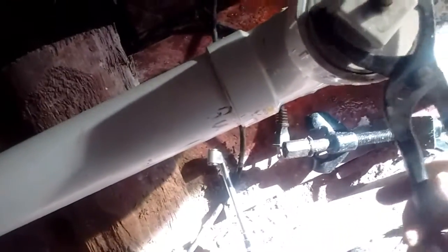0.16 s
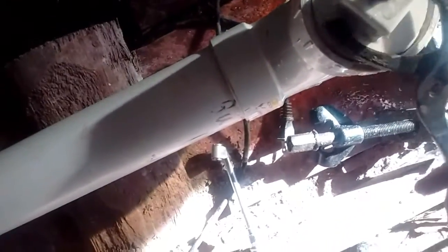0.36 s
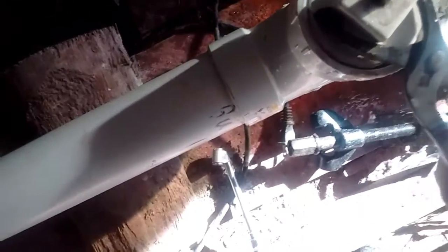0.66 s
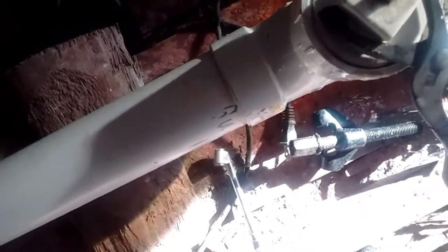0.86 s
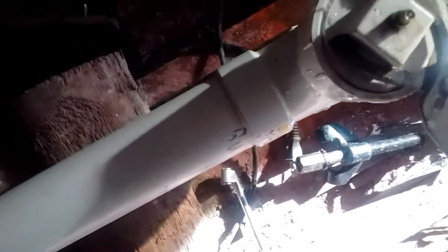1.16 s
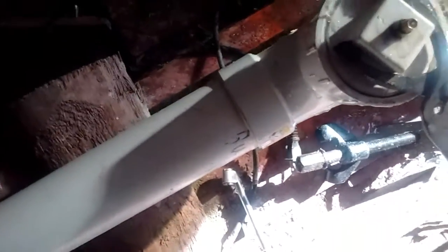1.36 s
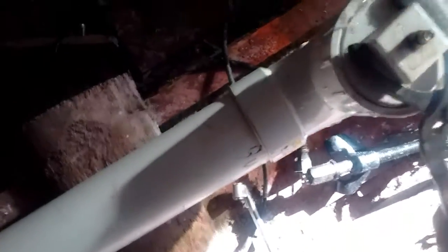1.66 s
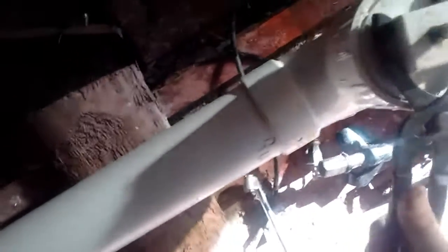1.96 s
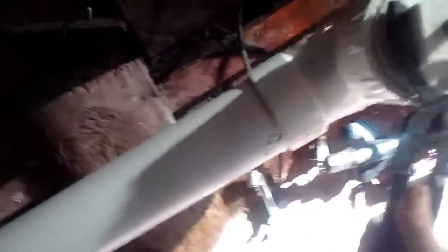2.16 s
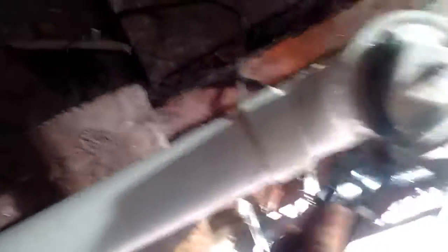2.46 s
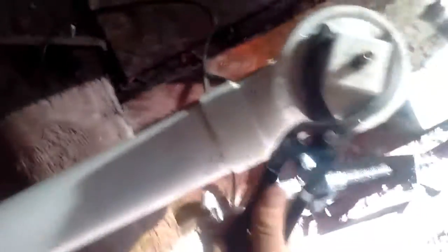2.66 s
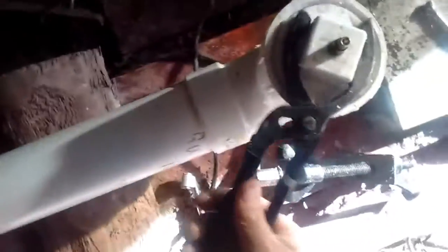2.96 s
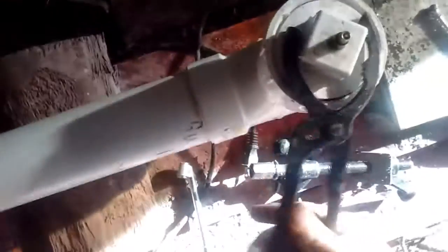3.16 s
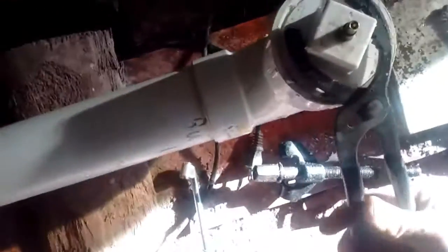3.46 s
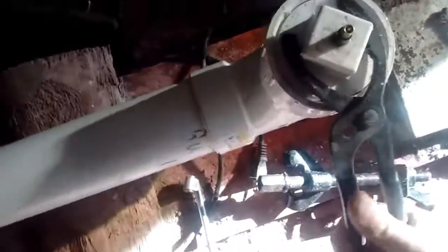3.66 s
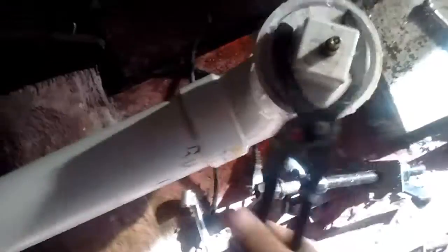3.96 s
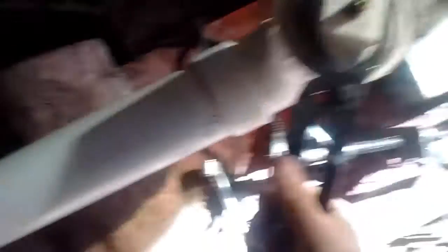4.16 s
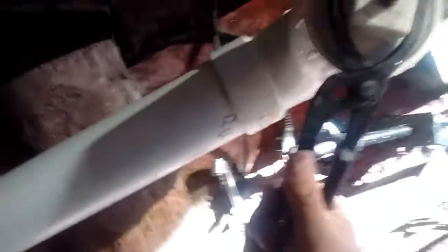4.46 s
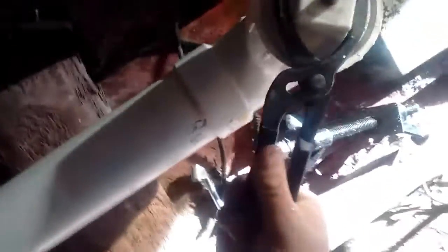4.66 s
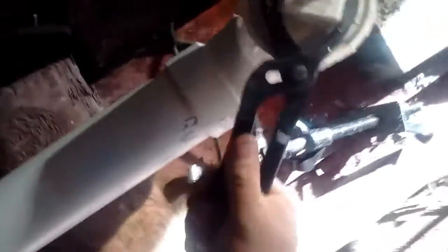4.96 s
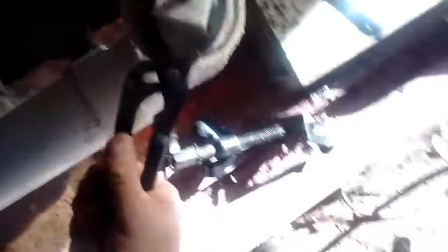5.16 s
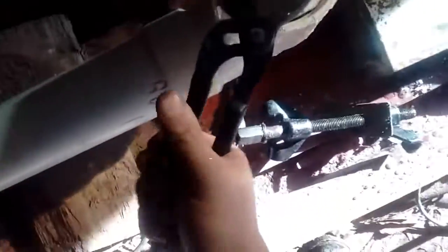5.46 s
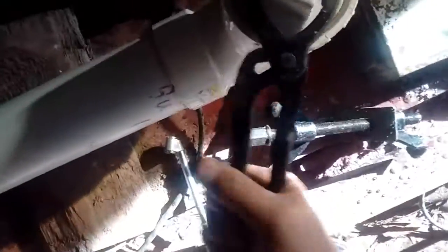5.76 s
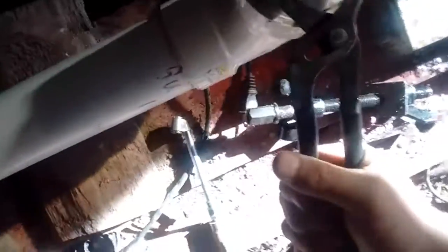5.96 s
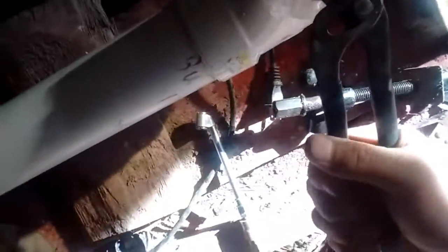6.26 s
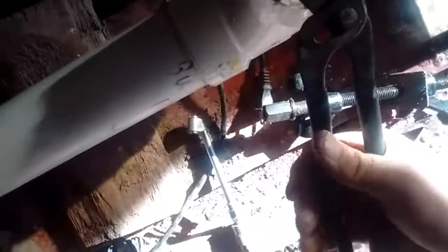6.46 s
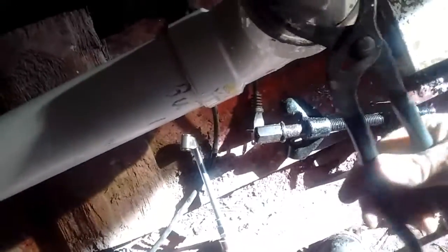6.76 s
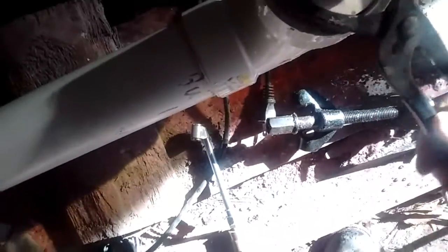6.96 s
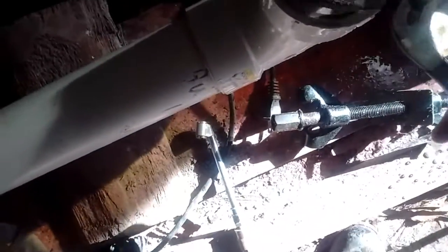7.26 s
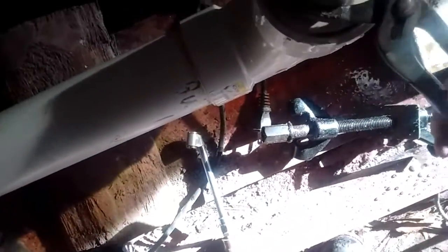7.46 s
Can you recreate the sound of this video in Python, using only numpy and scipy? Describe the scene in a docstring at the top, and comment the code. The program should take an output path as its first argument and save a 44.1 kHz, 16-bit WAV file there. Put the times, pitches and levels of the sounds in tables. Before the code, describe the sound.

Close up and nearly dry, a leaking pipe joint spits and bubbles quickly, then turns into an unsteady hissing spray that grows stronger in the second half. Pliers tightening the plastic nut add hollow bumps, brief judders and a few sharp clacks. Underneath are wet gurgles, small chirps of air, ticking droplets, soft splashing on the floor and a slight handling rumble on the microphone.

```python
"""Water sprays from a leaking plastic pipe fitting while pliers tighten it, close to a mono microphone.
The leak starts by sputtering, some twenty squelches and spits a second. Air gurgles and whistles in the
wet thread; water drums on the pipe and patters on the floor. Soon the pliers knock and clack on the
hollow pipe, and air and handling rumble on the microphone. At 2.3 s the leak opens into a hissing jet.
From 3.6 s the jaws now and then judder and slip on the nut, and the thread creaks."""
import sys
import numpy as np
from scipy import signal
from scipy.fft import rfft, irfft, next_fast_len
from scipy.io import wavfile
from scipy.ndimage import uniform_filter1d, map_coordinates

SR = 44100
rng = np.random.default_rng(int(sys.argv[2]) if len(sys.argv) > 2 else 0)


def waveform_to_disk(signal):
    """Save audio, clipped to [-1, 1], as 16-bit WAV at the path in sys.argv[1]."""
    frames = np.transpose(np.atleast_2d(signal))
    scaled = np.clip(frames, -1, 1) * 32767
    samples = np.round(scaled).astype(np.int16)
    wavfile.write(sys.argv[1], SR, samples)


N = 335601
TIME = np.arange(N) / SR


def gain_of(db):
    return 10 ** (np.asarray(db) / 20)


def unit_rms(x):
    return x / np.sqrt(np.mean(x ** 2) + 1e-20)


def unit_peak(x):
    return x / abs(x).max()


def value_at(curve, time_s, column=1):
    curve = np.array(curve)
    return np.interp(time_s, curve[:, 0], curve[:, column])


def gain_curve(curve, column):
    return gain_of(value_at(curve, TIME, column))


def add(mix, start_s, sound):
    part = mix[max(round(start_s * SR), 0):][:len(sound)]
    part += sound[:len(part)]


def colour(x, spectrum, size=4096):
    """Minimum-phase filter of unit energy with the given spectrum."""
    hz, db = np.transpose(spectrum)
    bin_hz = abs(np.fft.fftfreq(size, 1 / SR))
    log_gain = np.log(gain_of(np.interp(np.log(bin_hz + 1), np.log(hz), db)))
    taps = np.fft.ifft(np.exp(np.conj(signal.hilbert(log_gain)))).real[:size // 2]
    return signal.oaconvolve(x, taps / np.linalg.norm(taps))[:len(x)]


def wander(rate_hz):
    """Smooth random drift, rms 1."""
    size = next_fast_len(N, True)
    lowpass = np.exp(-(np.fft.rfftfreq(size, 1 / SR) / rate_hz) ** 2)
    return unit_rms(irfft(rfft(rng.standard_normal(size)) * lowpass, size)[:N])


def impacts(per_s, spread_db, share):
    """Separate uneven hits carry this share of the power; the rest is a wash of noise."""
    size = gain_of(spread_db * np.minimum(rng.exponential(1, N), 4.5))
    hits = size * rng.choice([-1., 1.], N) * (rng.random(N) < per_s / SR)
    return np.sqrt(share) * unit_rms(hits) + np.sqrt(1 - share) * rng.standard_normal(N)


def resonate(x, pitch_hz, width_hz):
    """Steep resonance following a pitch curve; white noise keeps its level."""
    carrier = np.exp(2j * np.pi * np.cumsum(pitch_hz) / SR)
    pole = np.exp(-np.pi * width_hz / SR)
    baseband = signal.lfilter([(1 - pole) ** 2], [1, -2 * pole, pole * pole], x / carrier + 1e-18)
    return (carrier * baseband).real * np.sqrt(8 / (1 - pole))


# Prominent spits: start_s, length_s, level_db
MAIN_SPITS = [(0.043, 0.02, -51.5), (0.104, 0.015, -50), (0.176, 0.012, -49), (0.197, 0.014, -46.5),
              (0.266, 0.0075, -45), (0.332, 0.013, -48), (0.398, 0.014, -42), (0.426, 0.018, -46),
              (0.453, 0.044, -44), (0.534, 0.012, -43.5), (0.589, 0.011, -43), (0.621, 0.012, -42),
              (0.671, 0.037, -42.5), (0.729, 0.014, -42.5), (0.751, 0.031, -38.5), (0.795, 0.018, -42.5),
              (0.827, 0.017, -36.5), (0.893, 0.015, -41), (0.916, 0.043, -40.5), (1.001, 0.02, -40.5),
              (1.17, 0.028, -45.5), (1.222, 0.018, -46), (1.304, 0.026, -47), (1.339, 0.0287, -47.5),
              (1.46, 0.012, -44.5), (1.514, 0.024, -46.5), (1.638, 0.038, -46), (1.749, 0.021, -50),
              (1.829, 0.015, -45.5), (1.892, 0.013, -53), (2.02, 0.017, -52.5), (2.057, 0.013, -50.5),
              (2.112, 0.0043, -40.5), (2.171, 0.015, -49.5), (2.318, 0.011, -43)]
# Course of the sputter: time_s, spits_per_s, spit_db, squelch_db, burst_hz
SPUTTER_CURVE = [(0, 14, -50.5, -48, 3840), (0.3, 14, -46, -47, 4120), (0.75, 17, -44, -43, 4380),
                 (1.1, 29, -48, -44, 5120), (1.5, 25, -49.5, -43, 4850), (1.8, 24, -54.5, -40.5, 4720),
                 (1.95, 22, -61, -53, 5160), (2.3, 24, -58, -52, 5000)]
SPUTTERING = TIME < MAIN_SPITS[-1][0]


def spit_train(jitter_beats=0.41, open_share=0.61, spread_db=8.5, pitch_spread=0.079, octaves_per_s=14):
    """Random spits keep an uneven beat between the prominent ones."""
    chance, spits = rng.uniform(-1, 1, (200, 5)), [MAIN_SPITS[0]]
    for before, after in zip(MAIN_SPITS, MAIN_SPITS[1:]):
        gap_s = after[0] - before[0]
        beats = max(round(gap_s * value_at(SPUTTER_CURVE, before[0] + gap_s / 2)), 1)
        for k in range(1, beats):
            late, longer, louder, _, _ = chance[len(spits)]
            start_s = before[0] + (k + jitter_beats * late) * gap_s / beats
            length_s = min(open_share * gap_s / beats, 0.022) * (1 + longer / 2)
            spits.append((start_s, length_s, value_at(SPUTTER_CURVE, start_s, 2) + spread_db * louder))
        spits.append(after)
    for (start_s, length_s, level_db), (*_, higher, faster) in zip(spits, chance):
        lead_db = value_at(SPUTTER_CURVE, start_s, 3)
        burst_hz = value_at(SPUTTER_CURVE, start_s, 4) * (1 + pitch_spread * higher)
        yield start_s, length_s, level_db, lead_db, burst_hz, octaves_per_s * (1 + faster)


# Spray of a spit: freq_hz, level_db
SPIT_SPECTRUM = [(1000, -11), (3000, -7.5), (4800, 3), (5600, 0.5), (6450, -6), (7300, 0), (8300, 4.5),
                 (9300, -6.5), (10200, -2), (11400, -6.5), (12600, -2), (14000, -21), (15300, 0)]


def sputter(squelch_db=-2, spit_db=1, low_hz=2600., rise_s=0.013, spray_hz=(7000., 10500.)):
    """A plug of water thins in the gap, climbing in pitch until it bursts into spray."""
    squelch_env, spit_env = np.zeros(N), np.zeros(N)
    pitch_hz, sweep_hz = np.full(N, low_hz), np.full(N, spray_hz[0])
    end_s = 0
    for start_s, length_s, level_db, lead_db, burst_hz, octaves_per_s in spit_train():
        lead = slice(round(end_s * SR), round(start_s * SR))
        end_s = start_s + length_s
        burst = slice(lead.stop, round(end_s * SR))
        to_go_s = abs(start_s - TIME[lead])
        pitch_hz[lead] = np.maximum(burst_hz * 2 ** (-octaves_per_s * to_go_s), low_hz)
        squelch_env[lead] = gain_of(lead_db) * (0.62 + 0.53 / (1 + to_go_s / rise_s))
        pitch_hz[burst] = burst_hz
        sweep_hz[burst] = np.geomspace(*spray_hz, len(TIME[burst]))
        spit_env[burst] = gain_of(level_db)
    pitch_hz, squelch_env, spit_env = uniform_filter1d([pitch_hz, squelch_env, spit_env], size=90)
    spit_env *= gain_of(1.8 * wander(70))
    linger = np.exp(-1 / (0.0009 * SR))
    spit_env = signal.lfilter([1 - linger], [1, -linger], spit_env)
    pitch_hz *= np.exp(0.04 * wander(90))
    squelch = resonate(impacts(1200, 2.4, 0.83), pitch_hz, width_hz=720) * gain_of(0.92 * wander(70))
    droplets = 0.9 * impacts(2600, 2.6, 0.4)
    sweep = gain_of(-5) * resonate(rng.standard_normal(N), sweep_hz, width_hz=1600)
    spit = colour(spit_env * (droplets + sweep) * gain_of(2 * wander(270)), SPIT_SPECTRUM)
    return gain_of(squelch_db) * squelch_env * squelch + gain_of(spit_db) * spit


# Jet strength as the nut turns: time_s, whistle_db, mist_db
JET_LEVELS = [(0, -69, -65.5), (0.6, -59, -60.5), (1.05, -48, -50.5), (1.22, -60, -57), (1.66, -74, -50.5),
              (1.8, -75, -57), (2.2, -63, -63), (2.32, -52, -48.5), (2.42, -37.5, -37), (2.52, -46, -39),
              (2.66, -51.5, -49.5), (3.15, -45, -47), (3.48, -53.5, -54), (3.97, -46, -51.5),
              (4.15, -57, -53), (4.52, -65, -49.5), (4.61, -45.5, -44.5), (5.13, -39.5, -42.5),
              (5.24, -59, -42.5), (5.4, -39.5, -42), (5.9, -37, -40.5), (6.0, -44, -47), (6.6, -39, -42.5),
              (6.91, -39, -44.5), (6.96, -46, -48), (7.61, -39, -43.5)]
# Whistling band, shifting with the shape of the gap: time_s, pitch_hz
WHISTLE_PITCH = [(0, 8240), (2.5, 8200), (3.2, 7945), (4.0, 8050), (4.6, 7960), (5.0, 8086), (5.85, 8244),
                 (6.35, 7814), (6.9, 7930), (7.25, 7764), (7.61, 7900)]
# Whistling band: freq_hz, level_db
WHISTLE_SPECTRUM = [(5500, -23), (6500, -6.5), (7100, -6), (7700, -0.5), (8150, 2.5), (8600, -1.5),
                    (9200, -20.5), (10500, -55)]
# Fine mist: freq_hz, level_db
MIST_SPECTRUM = [(1500, -25), (4500, -9), (5600, -6.5), (6400, -46), (7300, 2.5), (9300, -1.5), (9900, 0),
                 (10900, -3), (11700, -4.5), (12700, -2), (14200, -9.5), (15200, -2), (16000, -34)]


def jet(centre_hz=8050, choke_db=4):
    """A thin jet hisses in one unsteady band and breaks into mist; it chokes while the leak sputters."""
    speed = value_at(WHISTLE_PITCH, TIME) / centre_hz * np.exp(0.022 * wander(70))
    band = colour(rng.standard_normal(N), WHISTLE_SPECTRUM)
    hiss = map_coordinates(band, [np.cumsum(speed)], order=3, mode="mirror")
    whistle = gain_of(0.5 * wander(65)) * gain_curve(JET_LEVELS, 1) * hiss
    mist_env = gain_of(0.5 + 0.3 * wander(32)) * gain_curve(JET_LEVELS, 2)
    mist = mist_env * colour(impacts(2500, 0.41, 0.61), MIST_SPECTRUM)
    choking_db = choke_db * wander(28) * SPUTTERING
    swell_db = 0.7 * wander(14) + 0.8 * wander(110)
    return (whistle + mist) * gain_of(swell_db + choking_db)


def bubbles(per_s=260, spread_db=3, range_hz=(3500, 5200), decay_cycles=9, glide_per_s=14, kinds=24):
    """Tiny bubbles of many sizes ring briefly, rising in pitch."""
    out, t = np.zeros(N), np.arange(SR // 50) / SR
    strength = gain_of(spread_db * np.minimum(rng.exponential(1, N), 3))
    births = strength * (rng.random(N) < per_s / SR)
    kind = rng.integers(0, kinds, N)
    for k, pitch_hz in enumerate(np.geomspace(*range_hz, kinds)):
        age = t * pitch_hz / decay_cycles
        ring = np.sqrt(age) * np.exp(-age) * np.sin(2 * np.pi * pitch_hz * t * (1 + glide_per_s * t / 2))
        out += signal.oaconvolve(births * (kind == k), ring)[:N]
    return unit_rms(out)


# Water on the pipe, on the floor and in the seam: time_s, drum_db, patter_db, gurgle_db
WATER_LEVELS = [(0.0, -58, -58, -52), (0.72, -54.5, -52.5, -53), (1.55, -52, -49.5, -52),
                (1.93, -62.5, -56.5, -52.5), (2.29, -60, -58.5, -55), (2.45, -63.5, -55, -57.5),
                (2.65, -65, -58, -49.5), (3.07, -53.5, -52, -45.5), (3.24, -49.5, -54, -47.5),
                (3.64, -67, -64, -54), (4.19, -61.5, -58, -53.5), (4.98, -58, -57.5, -50),
                (5.3, -56.5, -53, -53), (5.83, -57, -56, -46.5), (6.1, -61, -61, -53.5),
                (6.38, -56, -56, -47.5), (6.74, -50.5, -53, -48.5), (6.91, -58, -63, -45),
                (6.95, -57, -65, -57), (7.03, -57.5, -60, -54), (7.61, -48.5, -51, -45.5)]
# Wash in the seam: freq_hz, level_db
GURGLE_SPECTRUM = [(1500, -43), (3000, -20), (3500, -9), (4100, -3), (4900, -4), (5500, -9.5),
                   (6300, -12.5), (7500, -45)]


def gurgle(wash_db=-4.5, bubble_db=-6, chirp_db=-10, cycles_per_s=16, low_hz=3800, high_hz=5200):
    """Air and water alternate in the thread: wash, bubbles and chirps that grow once the jet opens."""
    cycle = np.cumsum(cycles_per_s * np.exp(0.73 * wander(12))) / SR % 1
    start_hz = low_hz * np.exp(0.07 * wander(7.4))
    fizz = impacts(900, 2.5, 0.6) * gain_of(3 * wander(20))
    chirps = resonate(fizz, start_hz + (high_hz - start_hz) * cycle ** 5.1, width_hz=1400)
    chirps *= gain_of(chirp_db - 6 * SPUTTERING)
    wash = gain_of(wash_db + 4.6 * wander(62)) * colour(rng.standard_normal(N), GURGLE_SPECTRUM)
    return gain_curve(WATER_LEVELS, 3) * (wash + gain_of(bubble_db) * bubbles() + chirps)


# Drops on the pipe: freq_hz, level_db
DRUM_SPECTRUM = [(40, -50.5), (100, -11.5), (160, 1), (215, 0.5), (300, -4.5), (420, -3), (600, -10),
                 (1500, -43)]
# Drops on the floor: freq_hz, level_db
PATTER_SPECTRUM = [(150, -35), (400, -3.5), (850, 6), (1300, 5), (1750, 5.5), (2200, 1.5), (2800, 2),
                   (3400, -17), (6000, -39)]


def splash(gain_db=1.5):
    """Falling water drums on the hollow pipe and patters on the floor."""
    drum = gain_curve(WATER_LEVELS, 1) * colour(impacts(200, 1.3, 0.2), DRUM_SPECTRUM)
    patter = gain_curve(WATER_LEVELS, 2) * colour(impacts(500, 3.5, 0.37), PATTER_SPECTRUM)
    return gain_of(gain_db) * (drum + patter)


def small_pockets(count=10, over_gurgle_db=5, spread_db=3, low_hz=3800, high_hz=4900):
    """Small air pockets come at random, following the level of the gurgle."""
    when, size, pitch = rng.random((count, 3)).T
    start_s = (np.arange(count) + when) / count * TIME[-1]
    level_db = value_at(WATER_LEVELS, start_s, 3) + over_gurgle_db + spread_db * (2 * size - 1)
    return list(zip(start_s, level_db, low_hz + (high_hz - low_hz) * pitch))


# Larger air pockets: pop_s, level_db, pitch_hz
AIR_POCKETS = [(0.1366, -30, 4690), (0.5324, -30.5, 3930), (1.217, -36, 4260), (1.413, -33, 4600),
               (1.4787, -29, 3770), (1.503, -27, 4070), (1.6785, -28.5, 4610), (1.6824, -22.5, 3485),
               (1.6855, -25.5, 5000), (1.839, -28.5, 4960), (1.936, -31, 4920), (1.9457, -31.5, 4580),
               (1.9752, -27.5, 5060), (1.9804, -31, 4670), (2.1013, -29, 4850), (2.997, -32, 3940),
               (3.022, -28, 4670), (3.5257, -26.5, 4456), (3.5355, -32, 4740), (4.907, -33, 4100),
               (4.9686, -28, 4210), (5.1419, -27, 4290), (5.26, -33, 3800), (5.334, -33.5, 3800),
               (5.518, -30.5, 4360), (5.654, -30, 5000), (5.701, -40, 4730), (5.799, -30, 4310),
               (5.8936, -29, 4510), (6.021, -33, 4490), (6.48, -33, 4590), (7.076, -31, 4920),
               (7.226, -31.5, 4600)]


def squirts(gain_db=1, squeeze_s=0.0084, squeeze_db=-17, ring_s=0.0016, glide_per_s=9):
    """An air pocket squeezes through the seam with a rising chirp and pops as a ringing bubble."""
    out, t = np.zeros(N), np.arange(-0.04, 0.03, 1 / SR)
    pop_env = (t >= 0) * np.exp(-abs(t) / ring_s)
    for pop_s, level_db, pitch_hz in AIR_POCKETS + small_pockets():
        glide_hz = pitch_hz * np.exp(glide_per_s * t)
        chirp = unit_rms(resonate(rng.standard_normal(len(t)), glide_hz, width_hz=1400))
        squeeze = gain_of(squeeze_db) * chirp * np.exp(-abs(t) / squeeze_s)
        pop = pop_env * np.sin(2 * np.pi * np.cumsum(glide_hz) / SR)
        add(out, pop_s + t[0], gain_of(level_db + gain_db) * (squeeze + pop))
    return signal.sosfilt(signal.butter(4, 6500, fs=SR, output="sos"), out)


# Air whistling through the wet thread: start_s, length_s, from_hz, to_hz, level_db
AIR_SQUEAKS = [(0.265, 0.061, 3140, 2550, -52), (0.42, 0.034, 4700, 5220, -47),
               (0.608, 0.07, 4270, 3910, -44.5), (0.715, 0.039, 3910, 4380, -42.5),
               (0.855, 0.043, 2830, 4200, -45), (1.675, 0.021, 3210, 3784, -40),
               (2.14, 0.039, 3500, 4300, -50), (2.192, 0.036, 3100, 3390, -50.5),
               (2.74, 0.034, 4300, 4960, -47), (2.914, 0.029, 4260, 3690, -43),
               (2.994, 0.045, 3880, 5100, -40.5), (3.045, 0.057, 3590, 4120, -46),
               (3.381, 0.021, 3500, 4100, -54), (3.881, 0.062, 2580, 3610, -57),
               (4.882, 0.03, 3020, 3700, -53), (4.922, 0.038, 3400, 3900, -50),
               (5.198, 0.05, 3300, 3790, -48.5), (5.292, 0.063, 2430, 2400, -56),
               (5.362, 0.028, 3530, 4100, -51), (5.47, 0.049, 2750, 3640, -51),
               (5.544, 0.061, 2380, 3850, -52), (5.621, 0.033, 2210, 3480, -46.5),
               (5.67, 0.029, 3260, 3780, -46), (5.842, 0.05, 3340, 4050, -48),
               (5.983, 0.02, 3460, 3454, -47), (6.056, 0.029, 3570, 3600, -46),
               (6.133, 0.029, 3680, 4110, -47.5), (6.204, 0.016, 3950, 4380, -45),
               (6.253, 0.03, 3090, 3600, -58), (6.726, 0.036, 3180, 3680, -52),
               (6.78, 0.046, 4760, 4040, -48.5), (6.949, 0.014, 3430, 3250, -50),
               (7.048, 0.023, 3790, 4030, -50), (7.52, 0.042, 4100, 4560, -46)]


def squeaks(width_hz=520, note_db=2, wobble=0.016):
    """A narrow air channel whistles: a wobbling, gliding note inside a fuzzy band."""
    out = np.zeros(N)
    waver = np.exp(wobble * wander(185))
    rasp = gain_of(2.5 * wander(300))
    for start_s, length_s, from_hz, to_hz, level_db in AIR_SQUEAKS:
        start, size = round(start_s * SR), round(length_s * SR)
        pitch_hz = np.geomspace(from_hz, to_hz, size) * waver[start:][:size]
        fuzz = unit_rms(resonate(rng.standard_normal(SR // 5)[:size], pitch_hz, width_hz))
        note = gain_of(note_db) * np.sin(2 * np.pi * np.cumsum(pitch_hz) / SR)
        squeak = unit_rms((fuzz + note) * rasp[start:][:size])
        add(out, start_s, gain_of(level_db) * squeak * signal.windows.tukey(size, 0.35))
    return out


# Droplets near the microphone: start_s, level_db
DROPLET_TICKS = [(0.301, -46), (0.3615, -34), (0.678, -27), (1.3877, -29), (1.482, -35), (1.699, -21),
                 (1.855, -33), (1.898, -33), (2.283, -34), (3.4682, -22), (2.049, -37), (2.131, -43),
                 (6.053, -24.5), (7.2325, -28)]
# Snap of a droplet: freq_hz, level_db
SNAP_SPECTRUM = [(200, -61), (1000, -8), (3000, -12), (4500, -1.5), (6400, -5), (8000, 7), (10000, -5),
                 (13000, -10), (15500, -3.5)]


def ticks(gain_db=3, decay_s=0.001):
    """Single droplets snap, bright and dry."""
    out, t = np.zeros(N), np.arange(SR // 50) / SR
    for start_s, level_db in DROPLET_TICKS:
        snap = colour(rng.standard_normal(len(t)) * np.exp(-t / decay_s), SNAP_SPECTRUM)
        add(out, start_s, gain_of(level_db + gain_db) * unit_peak(snap))
    return out


# Dull knocks on the pipe: start_s, level_db, pitch_hz
PIPE_KNOCKS = [(0.475, -32.5, 264), (0.553, -31, 197), (0.582, -33, 412), (1.79, -40.5, 292),
               (2.254, -38.5, 258), (2.536, -35.5, 261), (2.654, -39.5, 243), (2.714, -37.5, 256),
               (2.876, -33, 281), (3.232, -33.5, 250), (3.673, -32, 318), (3.926, -42, 260),
               (3.949, -30.5, 260), (3.963, -33, 285), (4.008, -26.5, 508), (4.012, -23, 324),
               (4.542, -42, 304), (4.68, -38.5, 282), (5.071, -25.5, 302), (5.949, -20, 196),
               (5.951, -19, 519), (5.964, -22.5, 341), (6.016, -35.5, 337), (6.68, -32, 262),
               (6.833, -31.5, 296), (6.851, -29, 264), (7.307, -30, 259), (7.394, -27, 279)]
# Modes of the hollow pipe: freq_hz, level_db, t60_s
PIPE_MODES = [(151, -2.5, 0.073), (197.2, 0, 0.086), (261, 1, 0.084), (328, 2.5, 0.092), (417, 2, 0.1),
              (513.5, 6, 0.067), (650, -11, 0.05), (760, -6, 0.039), (910, 9, 0.058), (1110, -4, 0.045),
              (1650, 0, 0.03)]
# Woody tap: freq_hz, level_db
TAP_SPECTRUM = [(250, -38.5), (480, 3), (1000, 1), (1600, -11), (3000, -38)]


def knocks(gain_db=2, attack_s=0.006, focus_db_per_octave=17, tap_db=-9, tap_s=0.003):
    """The pliers bump the pipe; each grip pulls the nearest mode to its pitch and favours it."""
    out, t = np.zeros(N), np.arange(SR // 5) / SR
    free_hz, mode_db, t60_s = np.transpose(PIPE_MODES)
    polarity = (-1.) ** np.arange(len(PIPE_MODES))  # neighbouring modes swing opposite ways
    for start_s, level_db, pitch_hz in PIPE_KNOCKS + judders():
        nearest = np.argmin(abs(np.log(free_hz / pitch_hz)))
        mode_hz = free_hz * pitch_hz / free_hz[nearest]
        struck_db = mode_db + rng.standard_normal(len(PIPE_MODES))
        struck_db -= focus_db_per_octave * abs(np.log2(mode_hz / pitch_hz))
        decays = gain_of(struck_db - 60 * t[:, None] / t60_s)
        modes = polarity * decays * np.sin(2 * np.pi * mode_hz * t[:, None])
        ring = modes.sum(1) * (1 - np.exp(-t / attack_s)) / np.linalg.norm(gain_of(struck_db))
        tap = colour(rng.standard_normal(len(t)) * np.exp(-t / tap_s), TAP_SPECTRUM)
        add(out, start_s, gain_of(level_db + gain_db) * (ring + gain_of(tap_db) * unit_peak(tap)))
    return out


# Clacks of the pliers and of big drops: start_s, level_db, pitch_hz
SHARP_CLACKS = [(0.989, -33.5, 1330), (1.076, -32, 1480), (1.684, -32, 1880), (3.232, -39, 880),
                (3.256, -32.5, 874), (3.416, -39, 1170), (3.671, -34, 1220), (3.977, -29, 855),
                (3.983, -39, 1800), (3.996, -22, 850), (3.998, -20, 1830), (4.653, -38, 960),
                (5.073, -34.5, 970), (5.435, -38, 950), (5.941, -21.5, 845), (5.942, -23, 1640),
                (6.86, -32, 1300), (6.92, -24.5, 2090), (6.92, -38, 1150), (6.9235, -30, 2600),
                (7.027, -37, 920), (7.232, -34.5, 1750)]
# Crack of the contact: freq_hz, level_db
CRACK_SPECTRUM = [(150, -72), (600, -11), (880, -1.5), (1280, -14.5), (1700, 4.5), (2200, -0.5),
                  (2700, -4.5), (3500, -30), (5000, -2.5), (6400, -47), (12000, -65)]
# Bite of steel: freq_hz, level_db
BITE_SPECTRUM = [(700, -54), (2300, -0.5), (3000, -0.5), (4000, -3.5), (5100, 1), (6400, -30), (12000, -42)]


def clacks(gain_db=4, ring_db=1, ring_cycles=1.1, crack_s=0.0011, focus_db_per_octave=7, bite_db=-6):
    """A hard, dead contact: a bright bite, a short crack and a ring that dies in a few cycles."""
    out, t = np.zeros(N), np.arange(SR // 20) / SR
    for start_s, level_db, pitch_hz in SHARP_CLACKS:
        spectrum = [(hz, db - focus_db_per_octave * abs(np.log2(hz / pitch_hz)))
                    for hz, db in CRACK_SPECTRUM]
        blow = rng.standard_normal(len(t)) * np.exp(-t / crack_s)
        crack = unit_peak(colour(blow, spectrum))
        bite = gain_of(bite_db) * unit_peak(colour(blow, BITE_SPECTRUM))
        age = t * pitch_hz / ring_cycles
        ring = gain_of(ring_db) * age * np.exp(1 - age) * np.sin(2 * np.pi * pitch_hz * t)
        add(out, start_s, gain_of(level_db + gain_db) * (unit_peak(crack + ring) + bite))
    return out


# Gusts of air and handling: start_s, length_s, level_db
MIC_GUSTS = [(1.113, 0.13, -56), (2.998, 0.5, -46.5), (3.576, 0.094, -54), (4.452, 0.034, -54.5),
             (4.576, 0.02, -53.5), (5.432, 0.099, -56), (5.553, 0.054, -53), (7.02, 0.16, -58),
             (7.232, 0.054, -57)]
# Microphone rumble: freq_hz, level_db
RUMBLE_SPECTRUM = [(15, -24), (30, -35), (55, -4.5), (130, -0.5), (190, -9), (300, -10), (800, -59)]


def rumble(gain_db=-1, flutter_db=2, calm_db=-73, attack_s=0.0032, release_s=0.025):
    """Air and handling buffet the microphone; each gust rises, holds and dies away."""
    push = gain_of(calm_db)
    for start_s, length_s, level_db in MIC_GUSTS:
        outside = np.maximum((start_s - TIME) / attack_s, (TIME - start_s - length_s) / release_s)
        push = push + gain_of(level_db) * np.exp(-np.maximum(outside, 0))
    push *= gain_of(gain_db + flutter_db * wander(28))
    return push * colour(rng.standard_normal(N), RUMBLE_SPECTRUM)


# Jaws slipping round the nut: let_go_s, rise_s, fall_s, scrape_db, judder_db
JAW_SLIPS = [(3.674, 0.033, 0.037, -39, -55), (4.001, 0.033, 0.0042, -28, -21.5),
             (5.341, 0.06, 0.0096, -39.5, -68), (5.943, 0.091, 0.045, -37, -26),
             (6.899, 0.033, 0.025, -34, -31.5)]
# Jaws on plastic: freq_hz, level_db
SCRAPE_SPECTRUM = [(80, -30), (180, 10), (500, 1), (900, -2), (1300, -3.5), (1700, -5.5), (2400, -9),
                   (3500, -10), (7000, -20)]


def scrapes(gain_db=-3):
    """The jaws slip over the plastic nut in a rush of tiny catches that builds and dies away."""
    force = np.zeros(N)
    for let_go_s, rise_s, fall_s, scrape_db, _ in JAW_SLIPS:
        t = TIME - let_go_s
        force += gain_of(scrape_db + gain_db) * np.exp(-np.maximum(-t / rise_s, t / fall_s))
    return force * colour(impacts(550, 0.43, 0.86), SCRAPE_SPECTRUM)


def judders(count=4, spacing_s=0.0148, pitch_hz=196, growth_db=6.5):
    """Before each slip the jaws catch, harder each time; gives rows for knocks()."""
    return [(let_go_s - (k + 1) * spacing_s, judder_db - k * growth_db, pitch_hz)
            for let_go_s, *_, judder_db in JAW_SLIPS for k in range(count)]


# Plastic thread creaking as it turns: start_s, length_s, from_hz, to_hz, level_db
THREAD_CREAKS = [(3.663, 0.031, 2100, 1050, -48), (4.53, 0.031, 2080, 2100, -51),
                 (5.299, 0.063, 1430, 1570, -45)]


def creaks(width_hz=800):
    """The thread sticks and slips; its quick catches ring one gliding resonance of the nut."""
    out, catches = np.zeros(N), impacts(670, 1.6, 0.56)
    for start_s, length_s, from_hz, to_hz, level_db in THREAD_CREAKS:
        start, size = round(start_s * SR), round(length_s * SR)
        creak = unit_rms(resonate(catches[start:][:size], np.geomspace(from_hz, to_hz, size), width_hz))
        add(out, start_s, gain_of(level_db) * creak * signal.windows.tukey(size, 0.5))
    return out


def room(x, wet_db, t60_s, echoes_per_s=2000):
    """Nearby wall and floor add a short, faint tail."""
    t = np.arange(SR // 3) / SR
    echoes = rng.standard_normal(len(t)) * (rng.random(len(t)) < echoes_per_s / SR)
    tail = echoes * (t > 0.003) * gain_of(-60 * t / t60_s)
    return x + gain_of(wet_db) * signal.oaconvolve(x, tail / np.linalg.norm(tail))[:N]


def scene():
    """Leak, pliers, falling water and rumble, the same in both channels."""
    leak = room(sputter() + jet() + gurgle() + squeaks() + squirts() + ticks(), wet_db=-14.5, t60_s=0.05)
    pliers = room(knocks() + clacks() + scrapes() + creaks(), wet_db=-13, t60_s=0.3)
    low_cut = signal.butter(2, 95, "high", fs=SR, output="sos")  # the pliers' sounds are kept clear of deep bass
    return np.tile(leak + signal.sosfilt(low_cut, pliers) + splash() + rumble(), (2, 1))


def record(dry, notch_hz=6400, notch_q=8, notch_share=0.66, cutoff_hz=15650):
    """The microphone port absorbs one narrow band; a steep low-pass cuts the highest treble."""
    notched = signal.lfilter(*signal.iirnotch(notch_hz, notch_q, SR), dry)
    heard = dry + notch_share * (notched - dry)
    lowpass = signal.firwin(511, cutoff_hz, window=("kaiser", 9), fs=SR)
    return signal.oaconvolve(heard, lowpass[None], "same")


dry = scene()
out = record(dry)
waveform_to_disk(out)
```